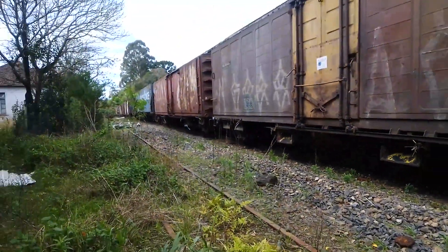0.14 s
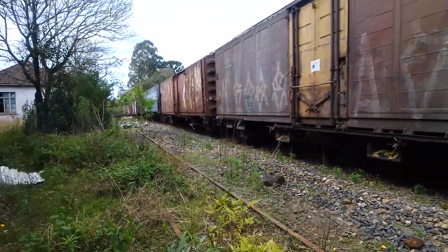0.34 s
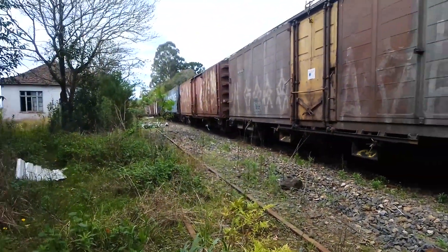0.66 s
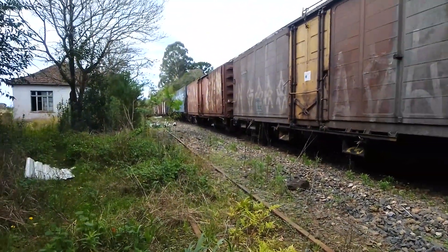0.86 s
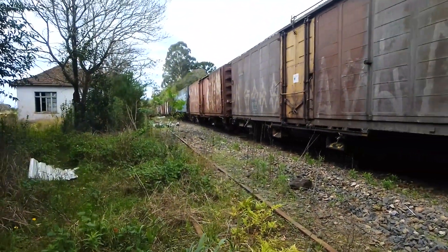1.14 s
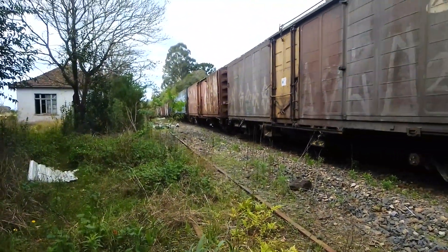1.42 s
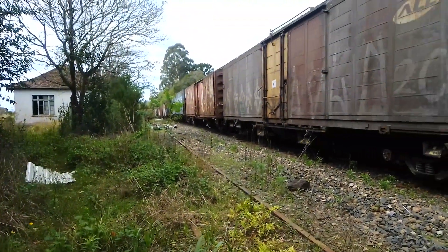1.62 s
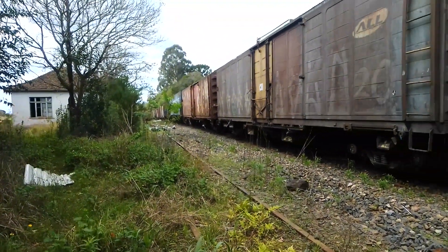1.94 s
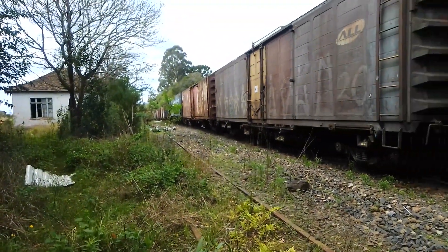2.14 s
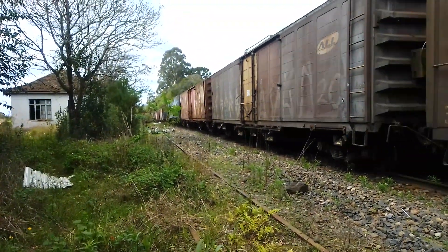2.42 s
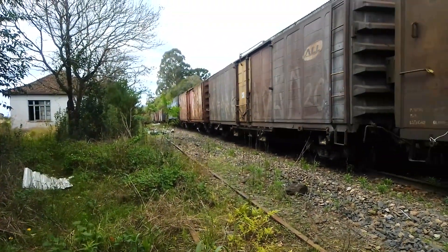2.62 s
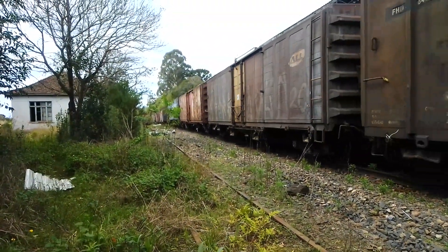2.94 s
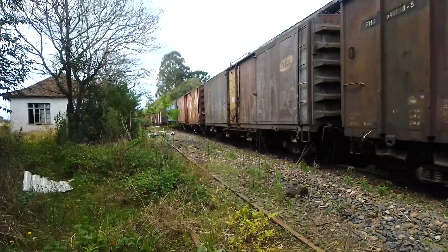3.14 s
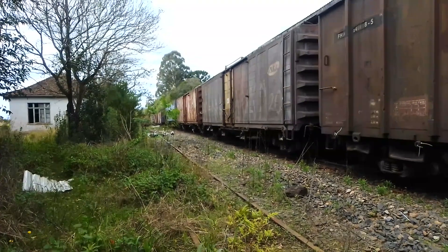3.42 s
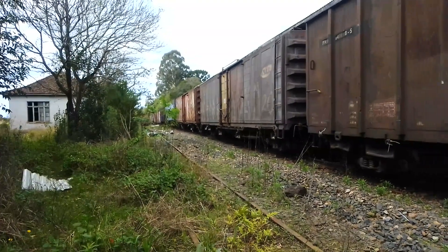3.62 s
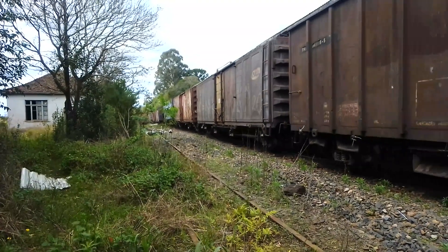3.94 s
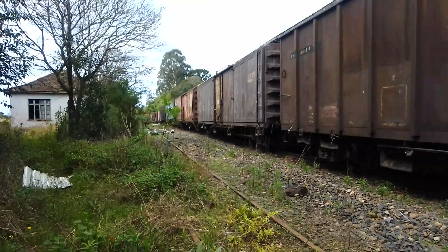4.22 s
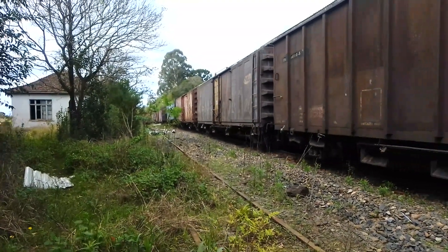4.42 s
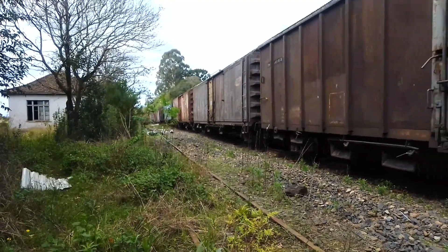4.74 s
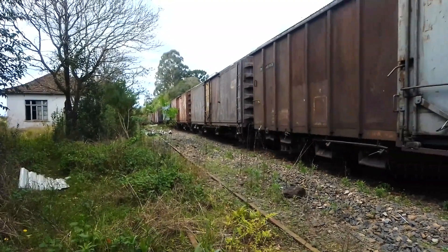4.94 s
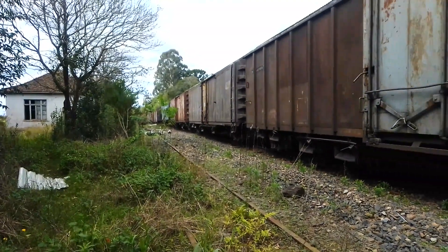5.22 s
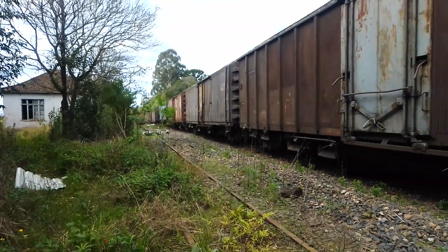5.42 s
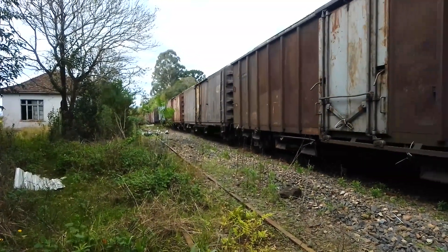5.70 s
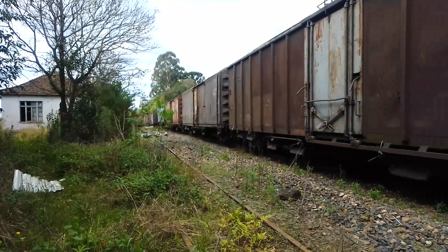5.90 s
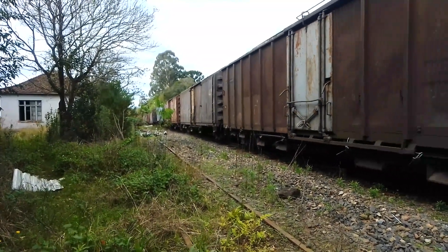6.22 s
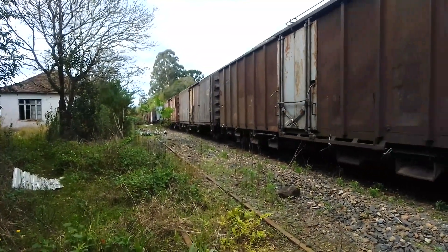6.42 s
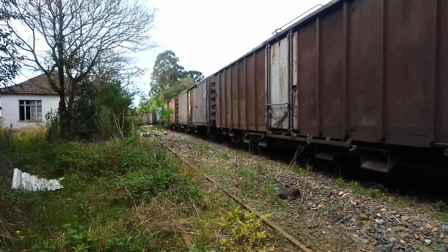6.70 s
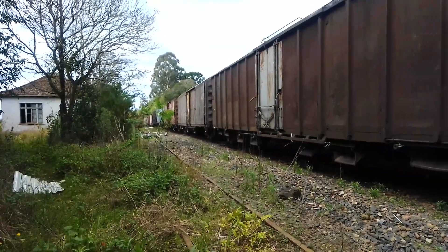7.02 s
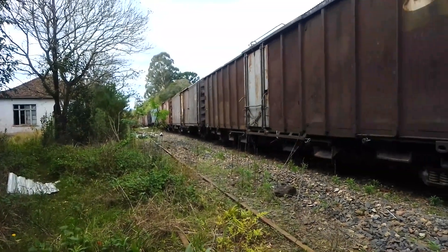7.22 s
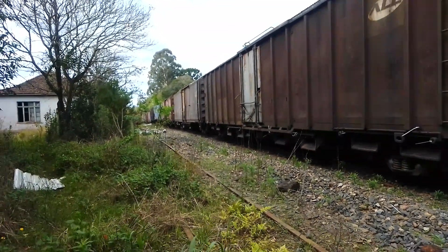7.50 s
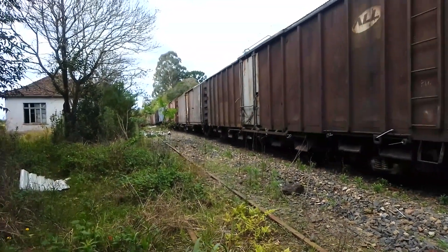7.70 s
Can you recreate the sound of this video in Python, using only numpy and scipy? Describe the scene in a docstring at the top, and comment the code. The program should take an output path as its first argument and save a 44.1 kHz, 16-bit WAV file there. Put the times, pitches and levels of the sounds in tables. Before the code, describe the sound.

Freight wagons roll slowly past outdoors; steel wheels screech harshly on the rail, fade to low rumble, then shriek again in bursts.

```python
"""Outdoors beside an old track: freight wagons roll slowly past a single small microphone with little bass.
One wheel after another grinds its flange on the rail: coloured noise, heard directly and exciting the
resonant modes of the steel wheel. Some modes sing out as squeals, made of near sines. Flange strikes are
noise cracks; a low rolling rumble of banded noise and a faint stir of air lie underneath."""
import sys
import numpy as np
from scipy import signal
from scipy.io import wavfile

SR = 44100
rng = np.random.default_rng(int(sys.argv[2]) if len(sys.argv) > 2 else 0)


def to_wav(sig):
    """Store sig (one row per channel, or 1-D mono) as 16-bit WAV at the path in sys.argv[1].

    Samples outside -1..1 are clipped; the rate is SR.
    """
    pcm = np.clip(np.atleast_2d(sig), -1, 1) * 32767
    pcm = np.round(pcm).astype(np.int16)
    wavfile.write(sys.argv[1], SR, pcm.T)  # frames by channels


N = 346604


def amp(db):
    """dB to gain."""
    return 10 ** (np.asarray(db) / 20)


def at_hz(points, hz):
    """Read a spectrum in dB on a log-frequency axis."""
    points_hz, points_db = np.array(points).T
    return np.interp(np.log(hz), np.log(points_hz), points_db)


def bandpass(x, low_hz, high_hz, order):
    """Butterworth band-pass."""
    return signal.sosfilt(signal.butter(order, [low_hz, high_hz], "band", fs=SR, output="sos"), x)


def stretch(rows, tail_s):
    """First sample, columns in time, and a gate with 6 ms edges; runs on for tail_s after the last row."""
    s, *columns = np.transpose(rows)
    first = int(s[0] * SR)
    last = min(N, int((s[-1] + tail_s) * SR))
    t = np.arange(first, last) / SR
    # a stretch that begins at sample 0 starts with the gate open
    opening_s = t - s[0] + .006 * (first == 0)
    closing_s = s[-1] + .006 - t
    gate = np.clip(np.minimum(opening_s, closing_s) / .006, 0, 1)
    return first, [np.interp(t, s, c) for c in columns], np.sqrt(gate)


def drift(points_per_s, size):
    """Slow random wander: unit normal points joined by straight lines."""
    points = rng.standard_normal(int(N / SR * 80))
    return np.interp(np.arange(size) / SR * points_per_s, np.arange(len(points)), points)


def coloured(spectrum, size, patchy_db, tilt=None):
    """Fifth-octave noise bands, each with its own flicker; scaled to rms 1 as if without flicker and tilt."""
    out, power = np.zeros(size), 0
    edges_hz = 25 * 2 ** (np.arange(47) / 5)
    white, together = rng.standard_normal((2, size)), drift(14, size)
    for k, (low_hz, high_hz) in enumerate(zip(edges_hz, edges_hz[1:])):
        hz = np.sqrt(low_hz * high_hz)
        if not spectrum[0][0] < hz < spectrum[-1][0]:
            continue
        # neighbouring bands use different noise
        band = bandpass(white[k % 2], low_hz, high_hz, order=3)
        level = amp(at_hz(spectrum, hz))
        power += level ** 2 * np.mean(band ** 2)
        moving_db = patchy_db * (0.1 * together + drift(18, size))
        if tilt:
            moving_db = moving_db + tilt(hz)
        out += level * amp(moving_db) * band
    return out / np.sqrt(power)


def mode(force, hz, t60_s):
    """Two-pole resonance; white noise of rms 1 comes out near rms 1."""
    r, w = amp(-60 / (t60_s * SR)), 2 * np.pi * hz / SR
    gain = np.sin(w) * np.sqrt(2 * (1 - r * r))
    # the tiny offset keeps the decaying filter off denormals
    return signal.lfilter([0, gain], [1, -2 * r * np.cos(w), r * r], force + 1e-18)


# Rubbing contacts, one list per wheel. Each row: time in seconds, grind level in dB before the output trim,
# level of the lows in dB, level of the treble in dB (both against the middle).
RUBS = [
    [(0.0, -11.5, -11, -1), (0.1, -14.5, -4.5, 0), (0.2, -16, 0, 2.5), (0.55, -17, 3, -2.5),
     (0.74, -18, 0.5, -0.5), (0.84, -19, -1, -2.5), (0.875, -22, 1, -0.5), (0.95, -15, -0.5, -2),
     (1.06, -20.5, 1, 2), (1.14, -31.5, 1, 3.5), (1.28, -41, 4, 2), (1.36, -39, 2, 3)],
    [(1.36, -30.5, -0.5, 12.5), (1.42, -35, -2, 21), (1.56, -43, 3, 11), (1.7, -39.5, 3, 6),
     (1.92, -38.5, 4.5, 0), (2.19, -48.5, 8.5, -30), (2.3, -51, 13, -21)],
    [(2.3, -47.5, 8, -12), (2.37, -46.5, 2.5, -3), (2.52, -32, 2.5, 4), (2.55, -33.5, -3, -4),
     (2.6, -31, -3, -2), (2.64, -34.5, -3.5, -2), (2.83, -49, 4.5, -10), (3.09, -62.5, 17, 4.5),
     (3.24, -54.5, 15.5, 4)],
    [(3.24, -46, 7.5, -5), (3.25, -31, 8.5, -1), (3.33, -15.5, -1.5, 6), (3.48, -20.5, -0.5, 5),
     (3.57, -33.5, -4, 3), (3.71, -45.5, 8, 8), (3.9, -42, 5.5, -25), (4.025, -42.5, 5.5, -14)],
    [(4.03, -36, -3, 0), (4.034, -31.5, -1, -12), (4.066, -33.5, 1, -5), (4.13, -44, 2, 11),
     (4.34, -51.5, 8, -14), (4.5, -77, 23.5, -10), (4.9, -83, 12, -3.5), (4.98, -59, 7.5, -2)],
    [(4.986, -57, 3, -4), (5.0, -33, 18.5, -1.5), (5.03, -25.5, 12, -3.5), (5.074, -14, 1, -3.5),
     (5.27, -13, -2.5, -0.5), (5.35, -16, 1.5, -0.5), (5.46, -15, 0, -1.5), (5.75, -15.5, -2, 0.5),
     (5.8, -22, 3, 4), (5.92, -48, -2, -3)],
    [(5.7, -38, -2, 3), (5.82, -20, -4, -6), (6.0, -20.5, -6, -3.5), (6.28, -20.5, -5, -3.5),
     (6.7, -22, 2, -2), (7.05, -22.5, 1.5, -1), (7.29, -24, 1.5, -3.5), (7.48, -35, 0, -18),
     (7.75, -44.5, 6.5, -38), (7.86, -37, 5, -27)],
]
# How each wheel rings. Each row: ring drive trim in dB, ring lost in dB per dB that the contact eases.
CONTACTS = [(1, -0.1), (-6, 0.8), (-1.5, 0.6), (-1, 0.1), (1, 0.5), (-4, .1), (-1, 0.6)]
# Grinding colour, one list per wheel. Each row: frequency in Hz, relative density in dB per Hz.
GRIND_SPECTRA = [
    [(410, -34), (700, -13), (1380, -10.5), (2340, -2), (3040, -4), (5590, -4), (6120, 4.5), (7830, -0.5),
     (8140, -4), (13300, -6), (15000, -24), (15600, -43)],
    [(410, -34), (700, -3), (1260, -4.5), (1470, 2.5), (3080, 5), (5810, 7.5), (6970, -5), (7940, -3),
     (8690, 10), (9400, -9), (14600, -67.5), (15600, -66)],
    [(410, -51.5), (700, -5), (1060, 10.5), (1380, -18), (1510, 4), (1650, 2), (2770, 7), (3040, 2),
     (5660, 3.5), (6120, 4), (7440, -2), (8470, -12.5), (11400, -35), (15600, -71.5)],
    [(410, -36), (700, -3), (1470, -11), (2880, 3), (3240, -7.5), (4370, -7), (6280, 2), (7830, -5.5),
     (8250, 0.5), (10300, -15), (12500, -25), (15600, -18)],
    [(410, -33), (700, 4), (968, -27), (1050, -4), (1450, -13), (1570, -7.5), (1810, -5), (2810, -1.5),
     (4660, -8.5), (6280, -4), (10400, -22), (15600, -60.5)],
    [(410, -17.5), (700, -12.5), (1450, -20), (1570, -13), (1690, -14.5), (3000, -10.5), (4090, -11),
     (4260, -14.5), (6280, -2), (8040, -8.5), (13200, -18.5), (15600, -12)],
    [(410, -26), (700, -15), (1220, -24.5), (1510, -14), (2080, -11.5), (2560, -7.5), (3040, -12),
     (3990, -13), (5450, -12), (6040, -5.5), (7340, -1), (13700, -16.5), (15000, -25), (15600, -48)],
]
# Wheel modes, one list per wheel. Each row: frequency in Hz, width in Hz (sets pair split, damping and
# share of the ring), relative level in dB.
WHEEL_MODES = [
    [(2309, 35, -9.5), (2480, 59, -14), (2770, 58, -13.5), (3310, 15, -25.5), (3440, 97, -17),
     (3704, 56, -8), (4120, 28.7, -8.5), (4200, 79, -15), (4830, 40, -9), (5180, 59, -18.5), (6050, 53, 0),
     (7080, 33, -7.5), (7290, 26, -21.5), (7960, 28, -13.5), (8225, 48, 0), (9000, 34, -9),
     (9260, 32, -16.5), (9240, 88, -15), (9700, 8.1, -19.5), (9820, 90, -12), (10740, 64, -3.5),
     (10600, 28, -9.5), (11500, 39, -19), (11500, 29, -23), (11780, 59, -15), (12500, 26, -17),
     (13000, 49, -9), (13530, 120, -16), (14300, 55, -26), (14700, 97, -24)],
    [(1420, 27, -11), (1890, 30, -2), (2550, 27, -10), (3250, 28, -23), (3840, 25, -11), (4150, 29, -16),
     (4800, 27.4, -14), (5050, 125, 8), (6100, 81, 7), (6450, 41, -14), (7570, 24, 11), (7550, 32, 4.5),
     (9600, 52, -1), (9780, 33, 4), (10800, 27, 3), (10200, 89, -28.5), (10700, 34, -25.5), (11300, 41, -8),
     (11800, 41, -25), (12400, 45, -29.5), (12700, 38, -31.5), (13000, 50, -15), (13900, 29, -35),
     (14200, 41, -22)],
    [(1020, 78, -33), (1600, 33, 8), (2160, 41, -13), (2690, 33, -7), (3800, 50, 13), (4100, 53, 1),
     (4800, 27, -1), (5650, 42, -28), (5940, 220, -2.5), (6500, 32, -19), (6560, 110, -26), (6890, 79, -18),
     (7140, 62, 9.5), (7520, 47, 14.5), (7430, 45, 8), (7470, 41, 4), (9150, 42, -33), (10260, 77, -36),
     (11050, 75, -3), (12100, 47, -36)],
    [(2305, 30, -8), (2852, 31, 0.5), (3480, 77, -9), (3716, 51, -7), (4060, 82, -12), (4300, 52, -27),
     (4530, 39, -7), (5240, 120, -18), (5000, 37, -20), (5700, 39, 1), (6150, 74, 2.5), (6380, 34, -16),
     (7100, 48, -3), (7760, 47, -15), (8200, 48, -26), (9000, 33, -15), (9070, 35, -22), (9460, 98, -31),
     (9860, 39, -14), (10530, 59, -16), (11100, 31, -15), (11400, 51, -22), (11700, 28, -8),
     (13000, 44, -20), (13400, 68, -24), (13900, 35, -28), (14700, 66, -30), (14900, 44, -38)],
    [(1603, 23, 2), (2900, 20, -4), (2955, 34, -17), (3460, 150, -17), (4060, 32, -4), (4950, 31, -11),
     (5500, 130, -21), (6300, 115, -13), (6530, 210, -4), (6660, 130, -15), (7420, 62, 0),
     (7950, 77, -27.5), (7900, 65, -32), (8760, 58, -28.5), (8900, 41, -22), (9500, 34, -10),
     (10150, 61, -9), (10700, 34, -17), (11100, 100, -32), (12200, 40, -32), (13000, 59, -39),
     (13400, 46, -42)],
    [(2620, 33.4, 0.5), (2720, 29, -27), (3060, 24, -4), (3300, 170, -8), (4114, 32, -9), (4200, 27, -10),
     (5050, 18, -10), (5320, 28, -13), (6120, 43, 10.5), (6500, 23, -5), (7270, 24, -10), (7950, 83, -26),
     (8190, 32, -35.5), (8770, 110, -8), (9300, 47, -24), (10400, 51, -24), (10200, 33, -1.5),
     (10970, 41, 0.5), (11300, 27, -26), (11500, 46, -15), (12300, 120, -8), (12800, 100, -24),
     (13300, 140, -26), (14700, 57, -33)],
    [(1550, 19, -6), (2460, 39, -26.5), (2600, 11.7, 4), (3280, 67, -33.5), (3470, 100, -16),
     (3790, 19, -4.5), (4700, 78, -5), (4670, 46, -41), (5430, 42, -103), (5820, 17, -27), (6120, 150, 0.5),
     (6700, 480, -10), (7290, 130, 0), (7400, 25, -20), (8370, 74, 1.5), (8880, 39, -46), (10400, 70, -10),
     (11000, 260, -9), (11100, 140, -24), (12200, 100, -14), (13400, 83, -4), (15230, 290, -3)],
]
RING_T60_S = 0.94               # undamped mode
DAMPING_PER_S_PER_HZ = 0.049    # added to 1/T60 per Hz of width


def wheel(rub, contact, spectrum, modes, blows):
    """Friction noise is heard directly and feeds the wheel's modes, which ring on after the contact lets go."""
    first, (grind_db, lows_db, treble_db), gate = stretch(rub, tail_s=.7)
    size = len(gate)
    ring_db, ring_lost = contact
    drive_db = grind_db + ring_db - ring_lost * (grind_db.max() - grind_db) - 6.5

    def tilt(hz):
        """Lows and treble swell apart from the middle."""
        octave = np.log2(hz / 4500)
        return np.clip(-octave, 0, 1) * lows_db + np.clip(octave - .3, 0, 1.5) * treble_db

    grind = amp(grind_db - 4.5) * gate * coloured(spectrum, size, patchy_db=3.0, tilt=tilt)
    shares = np.array([amp(db) * np.sqrt(width_hz) for hz, width_hz, db in modes])
    shares /= np.sqrt(np.sum(shares ** 2))
    ringing = np.zeros(size)
    for (hz, width_hz, db), share in zip(modes, shares):
        force_db = drive_db + tilt(hz) + 4.8 * drift(8.63, size)
        force = amp(force_db) * gate * rng.standard_normal(size)
        force += amp(8) * blows[first:first + size]
        t60_s = 1 / (1 / RING_T60_S + width_hz * DAMPING_PER_S_PER_HZ)
        # a wheel is never quite round: each mode is a close pair that beats
        for split in (-.25, .25):
            ringing += share * mode(force, hz + split * width_hz, t60_s)
    out = np.zeros(N)
    out[first:first + size] = grind + ringing + lesser_modes(grind)
    return out


def lesser_modes(grind):
    """Rail, bogie and wagon add a crowd of 90 short modes, shaken by the grinding hiss itself."""
    out, size = np.zeros(len(grind)), len(grind)
    modes_hz = np.exp(rng.uniform(np.log(1200), np.log(14500), 90))
    t60s_s, spread_db = rng.uniform(0.047, 0.15, 90), rng.normal(0, 1.4, 90)
    for hz, t60_s, db in zip(modes_hz, t60s_s, spread_db):
        force = grind * amp(0.77 * drift(7.3, size))
        out += amp(db - 17) * np.sqrt(hz / SR) * mode(force, hz, t60_s)
    return out


# Modes that lock to the stick-slip and sing. Each row: start in seconds, pitch in Hz, peak level in dB before
# dips and twin, swell in seconds, hold in seconds, fade in dB per second, pitch tremble in Hz.
SQUEALS = [(0.0, 2766, -16.5, 0.007, 0.026, 298, 14), (0.0, 8330, -19.5, 0.009, 0.034, 199.5, 19),
           (0.0, 1530, -34.5, 0.029, .1, 97, 2.9), (0.1, 1537, -25.5, 0.063, .04, 302.5, -7),
           (0.031, 6080, -19, .05, 0.2, 147.5, 23), (0.0, 10730, -44, 0.13, .93, 97.5, 12),
           (0.093, 8460, -29, 0.055, 0.11, 204.5, 16), (0.201, 668, -35, 0.099, 0.77, 170, 5.8),
           (0.2, 4800, -22, 0.072, 0.061, 148, 7.1), (0.24, 4290, -25, 0.063, .08, 151.5, 8),
           (0.273, 2745, -25.5, 0.031, 0.17, 192.5, 9.4), (0.278, 2570, -22, 0.054, .07, 203, 9.9),
           (0.288, 3680, -25, 0.055, 0.17, 148, 9.5), (0.358, 6025, -16, .04, .04, 98.5, 9.1),
           (0.359, 2305, -22.5, .08, 0.13, 78.5, 6.5), (0.371, 8380, -22, 0.049, .06, 97, 20),
           (0.454, 6025, -32, .05, 0.079, 200.5, 8.4), (0.487, 673, -27, 0.033, 0.019, 300, 3.2),
           (0.495, 2750, -21, 0.056, 0.062, 300, 6), (0.51, 2595, -20.5, 0.055, 0.053, 297, 4.5),
           (0.65, 670, -24.5, 0.025, 0.022, 300, 3), (0.678, 6080, -15.5, .04, 0.065, 59, 6.9),
           (0.7, 4310, -29, .05, .12, 154, 5), (0.84, 8320, -20.5, 0.051, 0.15, 167, 9.5),
           (0.859, 2425, -26, .04, 0.09, 202.5, 7.6), (0.903, 6025, -36, 0.036, 0.092, 90, 6.2),
           (0.9, 7960, -41, 0.055, 0.14, 92, 8), (0.912, 2770, -26, 0.044, .04, 202, 6),
           (1.085, 3350, -32, 0.013, 0.059, 191, 2.8), (1.176, 3370, -39, 0.08, 0.029, 43.5, 5.6),
           (1.366, 5300, -54, .02, .12, 99, 6), (1.363, 4800, -42, .02, 0.063, 55, 8.3),
           (1.373, 7940, -40, 0.023, 0.086, 57, 8.8), (1.37, 9140, -44, .02, 0.085, 49, 10),
           (1.37, 5800, -40, .01, .05, 80, 15), (1.37, 3830, -46, .02, .08, 72.5, 8),
           (1.365, 4344, -49, .02, .1, 50, 6), (1.4, 3359, -40, .06, 0.066, 48, 3),
           (2.29, 5830, -41, 0.077, .08, 151, 28), (2.357, 5700, -37, 0.053, .1, 150, 31),
           (2.44, 5560, -38, 0.051, 0.11, 250, 43), (2.34, 9130, -54.5, .12, 0.12, 103, 17),
           (2.38, 10250, -65, .1, .14, 96, 15), (2.381, 11050, -61, .1, 0.11, 100, 13),
           (2.845, 3650, -60.5, .1, .28, 198, 34), (2.756, 6700, -59.5, .05, 0.38, 201, 67),
           (3.3, 2800, -34, .09, .06, 192, 6), (3.46, 2827, -17.5, .1, 0.0067, 148, 2),
           (3.54, 2766, -39.5, .05, .03, 66, 2), (3.62, 2795, -39.5, 0.016, 0.044, 55, 1.8),
           (3.45, 12100, -42, .05, .05, 60, 10), (3.36, 4066, -31, 0.045, 0.077, 199.5, 6),
           (3.534, 4070, -33, 0.045, 0.045, 61.5, 13), (3.45, 3790, -35, .03, 0.069, 57, 7.8),
           (3.464, 5690, -26, .04, 0.026, 101.5, 8), (3.51, 4640, -46, .05, 0.12, 41, 6),
           (3.48, 10050, -40, .03, .03, 40, 10), (4.041, 7420, -49, .02, 0.068, 71, 18),
           (4.418, 2590, -64.5, 0.082, .47, 191, 15), (4.987, 2346, -22.5, 0.024, .04, 151, 23),
           (5.17, 2210, -25.5, 0.03, 0.045, 243, 15), (5.035, 3064, -21, 0.028, 0.037, 150, 5),
           (5.04, 6120, -18.5, 0.031, 0.11, 100, 11), (5.1, 1550, -15.5, 0.27, .16, 62, 1.4),
           (5.158, 3065, -21.5, 0.076, 0.034, 120, 10.2), (5.171, 3978, -22, 0.06, 0.056, 150, 4),
           (5.196, 5050, -25, 0.062, .05, 150, 8.5), (5.297, 6120, -15.5, 0.047, 0.12, 300, 3.8),
           (5.322, 3960, -17.5, 0.066, 0.032, 200, 4.7), (5.472, 3060, -22.5, 0.045, .2, 122, 3.4),
           (5.476, 3976, -22.5, 0.033, 0.3, 117, 4.7), (5.48, 6116, -16.5, 0.051, 0.17, 25, 13),
           (5.485, 5050, -22, 0.077, 0.2, 70, 2.3), (5.52, 1550, -19, 0.059, 0.057, 103, 1.5),
           (5.7, 1550, -17, 0.047, .03, 49, 1.5), (6.0, 1548, -29, 0.041, 0.037, 38, 2.8),
           (6.1, 6120, -31, 0.18, .45, 42, 29), (6.5, 8370, -28, 0.19, .35, 71, 20.6),
           (6.666, 2280, -29, 0.066, 0.19, 201, 16), (6.799, 2620, -28.5, 0.097, 0.3, 100, 16.4),
           (6.918, 2722, -30.5, 0.051, 0.19, 59, 14), (6.932, 2294, -30, .04, .08, 257, 5.1),
           (7.102, 2274, -29, 0.037, 0.048, 123, 10), (6.996, 9740, -42, .1, 0.18, 87, 14),
           (7.2, 1510, -33.5, 0.05, 0.043, 302, 2), (7.34, 1512, -35, .04, 0.034, 45, 2.6)]
SWELL_DB = 16.5    # rise out of the hiss
TREMBLES_PER_S, DROPOUT_DB, FLUTTER_DB = 45.0, 1.5, 4.5
TWIN_DB, TWIN_OFFSET_HZ = -11.5, (-38.961, -17.982)


def squeals():
    """Near sines swell, hold and fade; pitch trembles, level dips briefly, a lower twin tone beats with each."""
    out = np.zeros(N)
    for start, hz, peak_db, swell, hold, fade, tremble in SQUEALS:
        full, eases = start + swell, start + swell + hold
        shape = [(start, peak_db - SWELL_DB), (full, peak_db),
                 (eases, peak_db), (eases + 50 / fade, peak_db - 50)]
        first, (level_db,), gate = stretch(shape, tail_s=.01)
        size = len(gate)
        pitch_hz = hz + tremble * drift(TREMBLES_PER_S, size)
        phase = np.cumsum(2 * np.pi * pitch_hz / SR) + rng.uniform(0, 2 * np.pi)
        offset_cycles = rng.uniform(*TWIN_OFFSET_HZ) * np.arange(size) / SR + rng.random()
        twin = phase + 2 * np.pi * offset_cycles
        dips_db = DROPOUT_DB * drift(14, size) ** 2 + FLUTTER_DB * np.abs(drift(29.3, size))
        tones = np.sin(phase) + amp(TWIN_DB) * np.sin(twin)
        out[first:first + size] += np.sqrt(2) * amp(level_db - dips_db) * gate * tones
    return out


# Flange strikes on the rail. Each row: time in seconds, level in dB before trim and band-pass.
STRIKES = [(1.3609, -14.5), (4.0316, -25)]


def strikes():
    """Each strike is a short crack of exponentially decaying noise, band-passed."""
    out, t = np.zeros(N), np.arange(int(.05 * SR)) / SR
    for s, level_db in STRIKES:
        at = int(s * SR)
        crack = rng.standard_normal(len(t)) * np.exp(-t / 0.0028)
        out[at:at + len(t)] += amp(level_db - 10.0) * crack
    return bandpass(out, 2500, 9000, order=2)


# Rolling level of wheels and wagon bodies. Each row: time in seconds, level in dB before trim and surges.
ROLLING = [(0.0, -45), (0.5, -36.5), (1.05, -40.5), (1.27, -46), (1.35, -38.5), (1.6, -44), (3.24, -42),
           (3.26, -36.5), (3.68, -43), (4.99, -44), (5.01, -41), (5.25, -23.5), (5.3, -41), (6.08, -39),
           (6.13, -33.5), (6.74, -40.5), (7.09, -37), (7.86, -43)]
# Rumble colour. Each row: frequency in Hz, relative density in dB per Hz.
RUMBLE_SPECTRUM = [(100, -57.5), (170, -29), (270, -5), (383, -4), (487, -7), (642, -8), (1140, -16.5),
                   (1250, -16), (2020, -19.5), (2970, -43.5), (3570, -42), (5770, -51), (6690, -40),
                   (7470, -60), (14000, -61)]
SURGE_DB, SURGES_PER_S = 1.5, 12.0
BASS_FOLLOWS = 0.17    # share of the swells, in dB, left at 200 Hz and below


def rolling():
    """Broad rumble of the whole train, in lumps; its swells are a rattle of the wagon sides more than a thud."""
    _, (level_db,), _ = stretch(ROLLING, tail_s=1)
    swell_db = level_db - np.median(level_db)

    def tilt(hz):
        """Below 400 Hz the swells are weaker."""
        return (BASS_FOLLOWS - 1) * swell_db * np.clip(np.log2(400 / hz), 0, 1)

    surging_db = level_db + 0.5 + SURGE_DB * drift(SURGES_PER_S, N)
    return amp(surging_db) * coloured(RUMBLE_SPECTRUM, N, patchy_db=3.5, tilt=tilt)


def scene():
    """All wheels, squeals, strikes and the rumble, alike in both channels."""
    blows = strikes()
    train = rolling() + squeals() + blows
    for rub, contact, spectrum, modes in zip(RUBS, CONTACTS, GRIND_SPECTRA, WHEEL_MODES):
        train += wheel(rub, contact, spectrum, modes, blows)
    return np.array([train, train])


# Faint low stir of air at the microphone. Each row: frequency in Hz, relative density in dB per Hz.
AIR_SPECTRUM = [(15, -62), (26, -30), (43, -22), (97, -8.5), (156, -7.5), (170, -7), (220, -26.5),
                (370, -120)]
AIR_DB = -74    # before its low-pass
CUTOFF_HZ = 15850


def record(dry):
    """Peaks are rounded a little, the bass is cut, air stirs at the capsule, the top is cut."""
    rounded = 1.112 * np.tanh(dry / 1.293)
    thin = signal.sosfilt(signal.butter(6, 190, "high", fs=SR, output="sos"), rounded)
    stir = coloured(AIR_SPECTRUM, N, patchy_db=3.0)
    air = amp(AIR_DB) * signal.sosfilt(signal.butter(4, 170, fs=SR, output="sos"), stir)
    return signal.sosfilt(signal.cheby2(14, 70, CUTOFF_HZ, fs=SR, output="sos"), thin + air)


dry = scene()
out = record(dry)
to_wav(out)
```